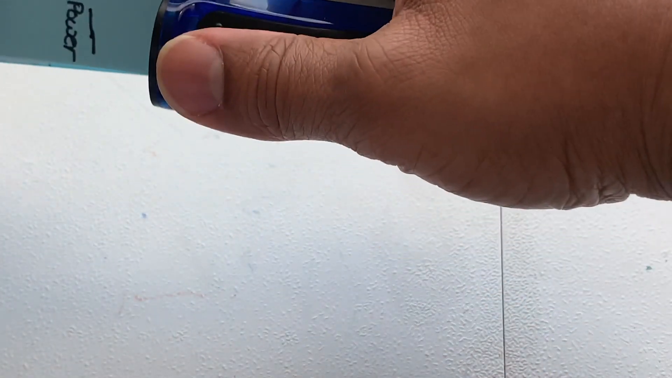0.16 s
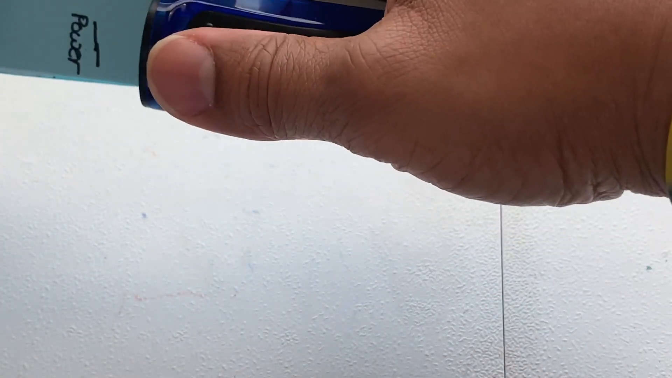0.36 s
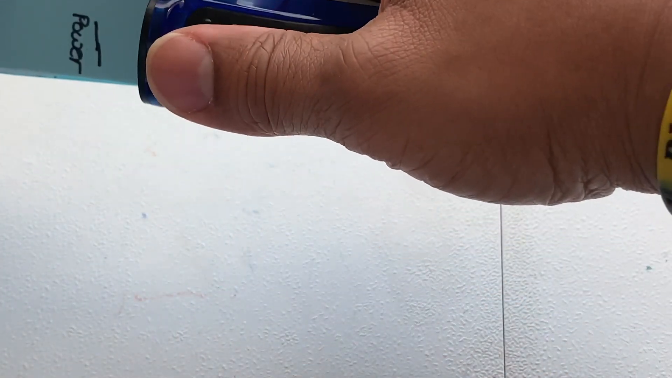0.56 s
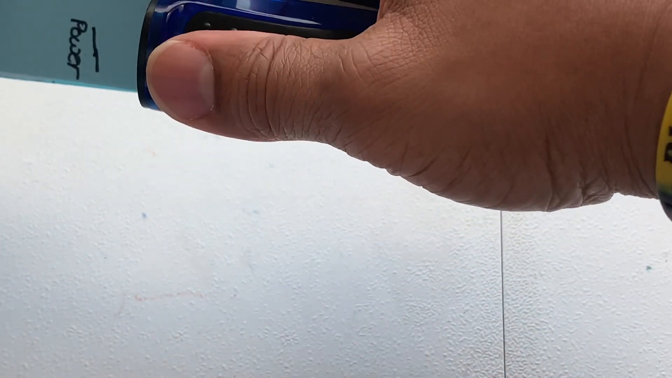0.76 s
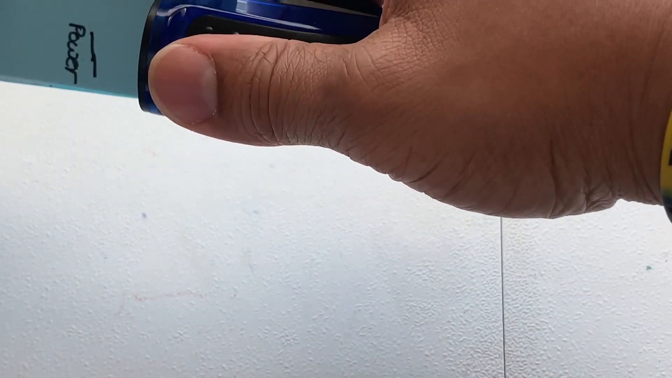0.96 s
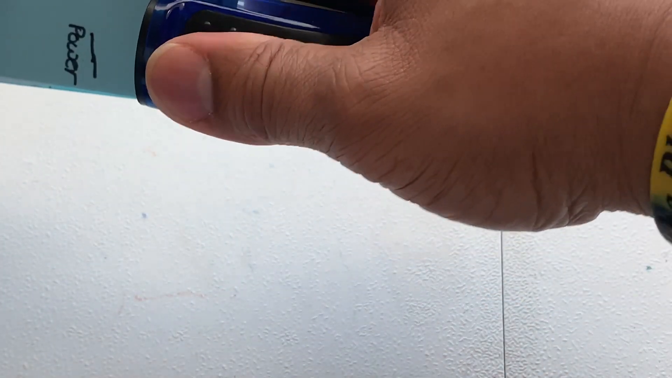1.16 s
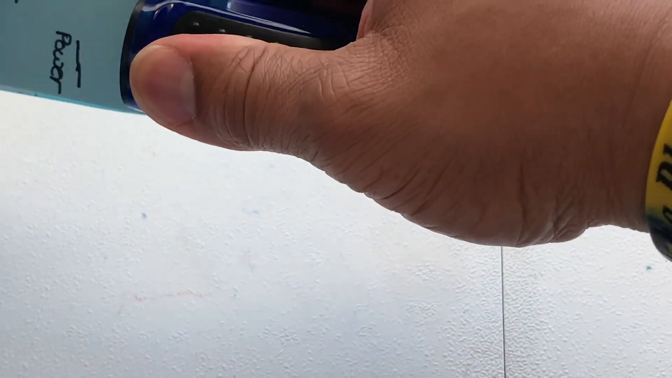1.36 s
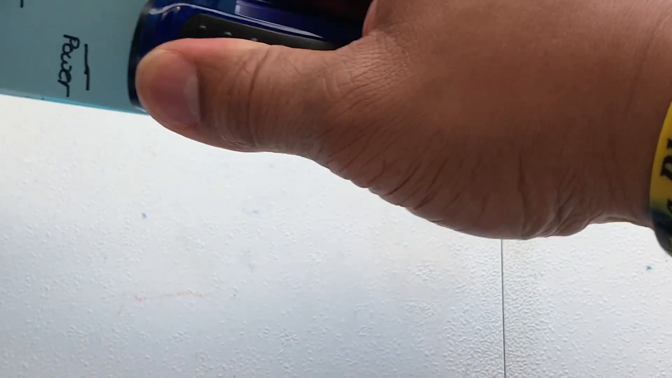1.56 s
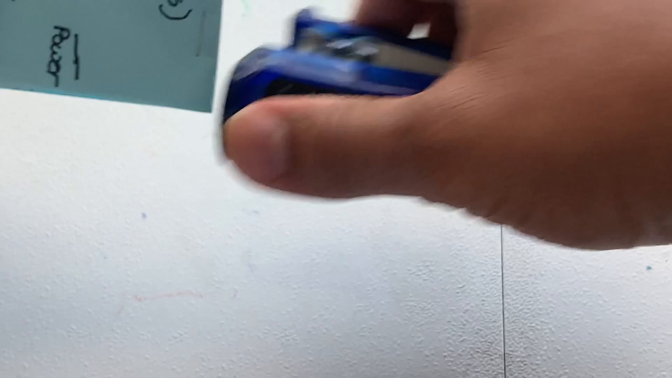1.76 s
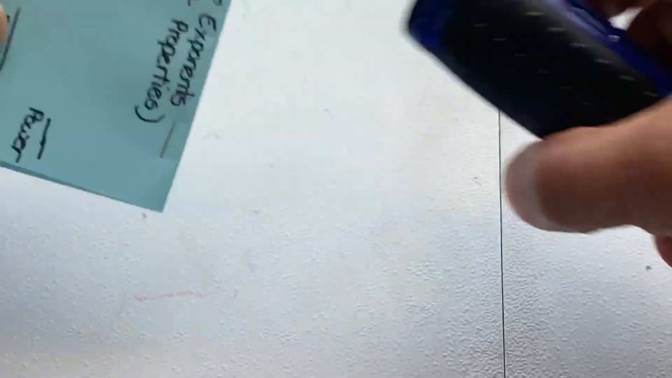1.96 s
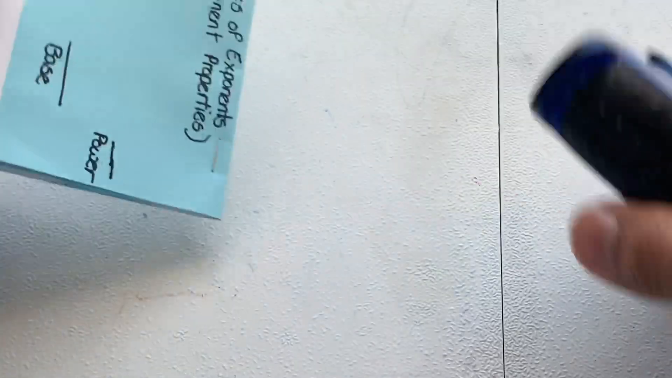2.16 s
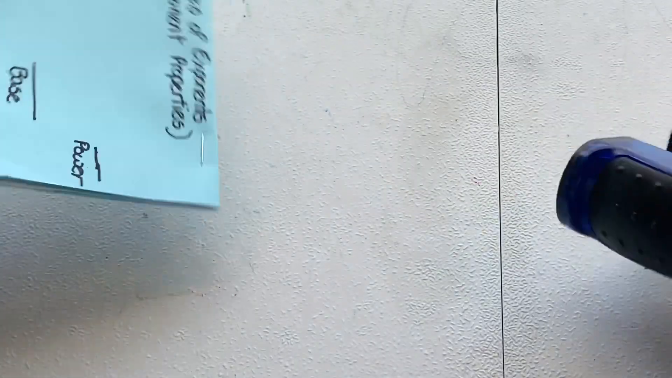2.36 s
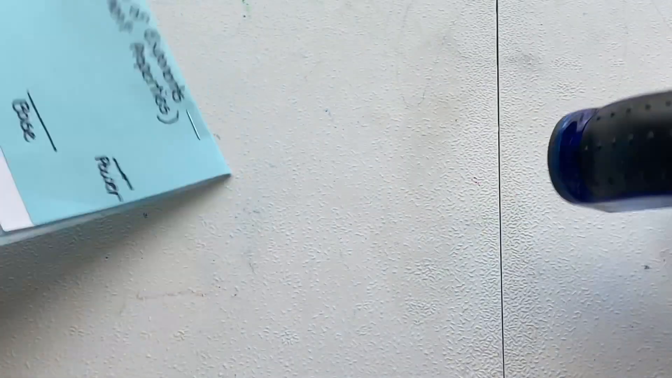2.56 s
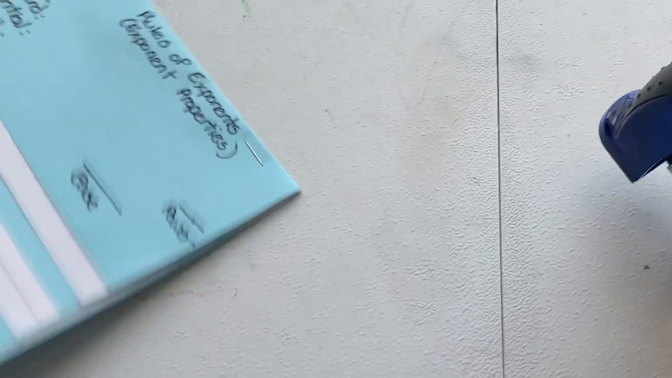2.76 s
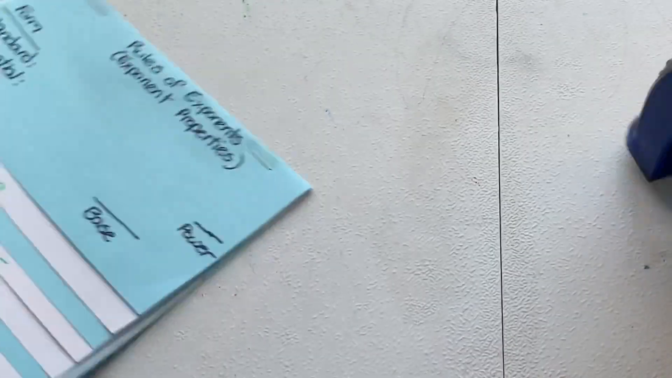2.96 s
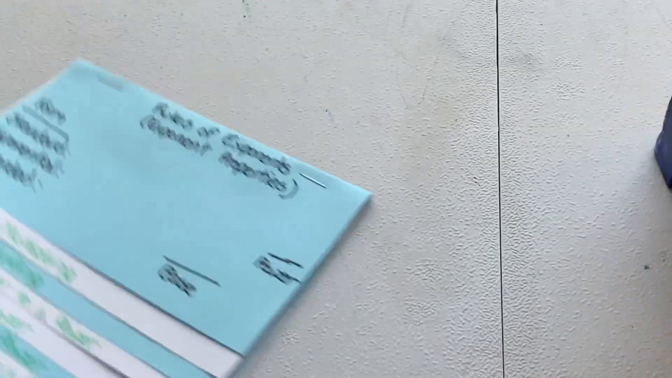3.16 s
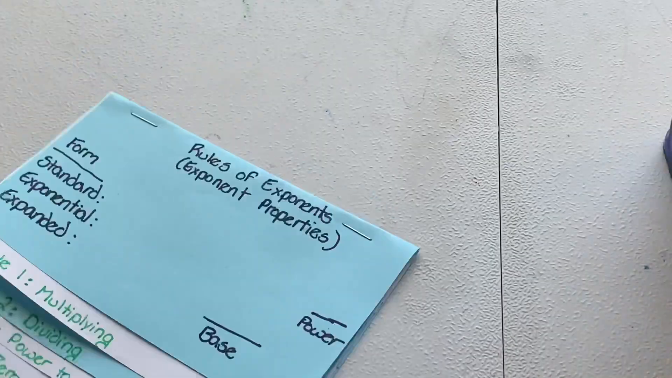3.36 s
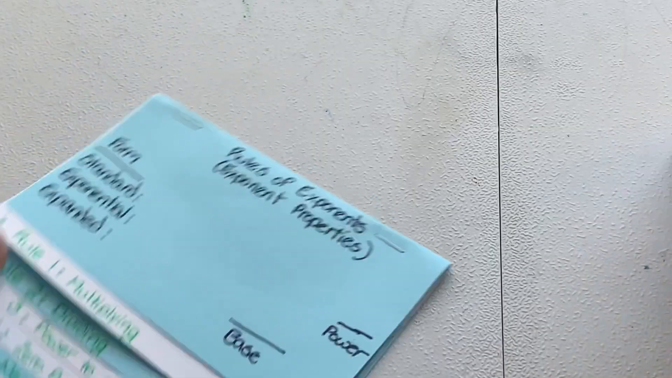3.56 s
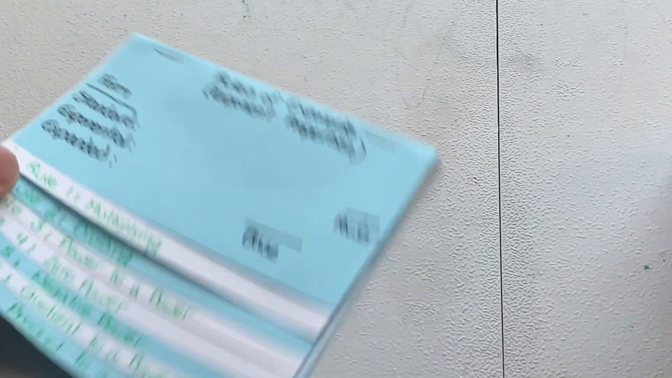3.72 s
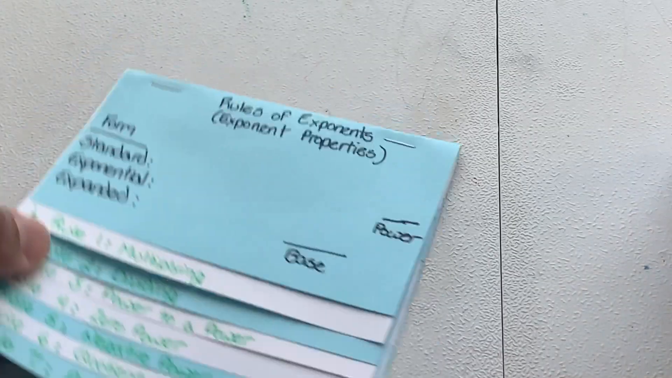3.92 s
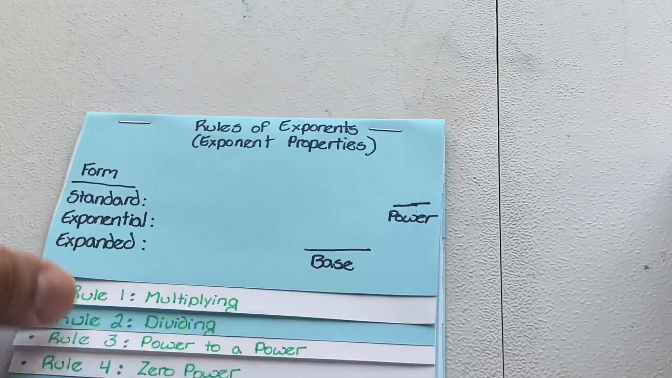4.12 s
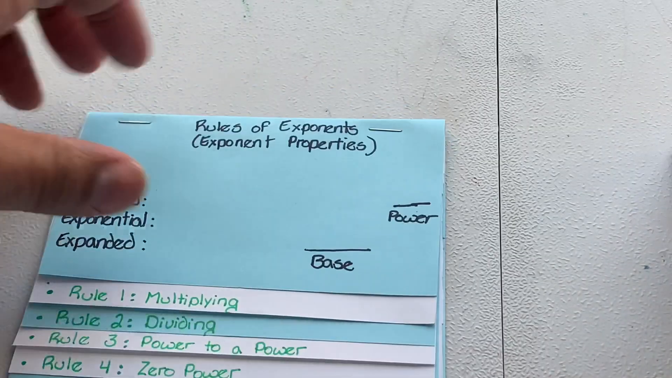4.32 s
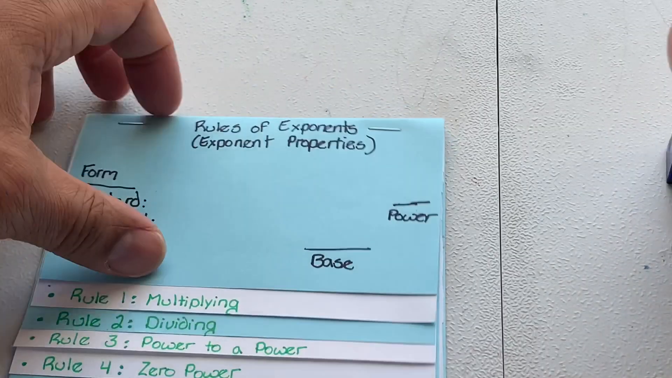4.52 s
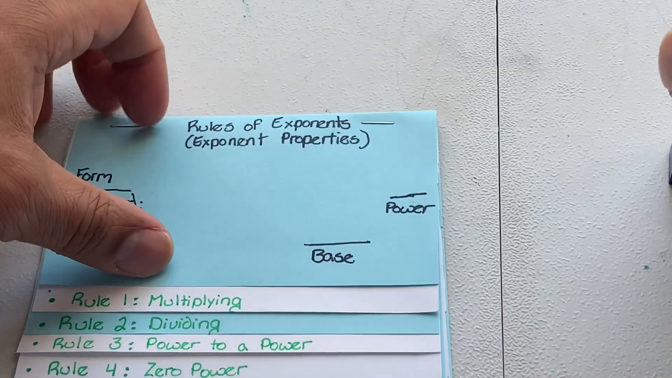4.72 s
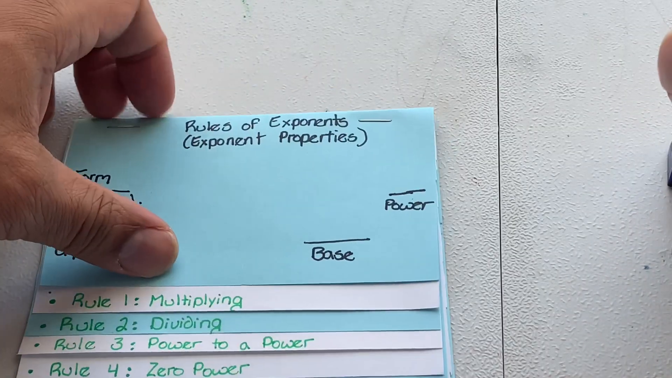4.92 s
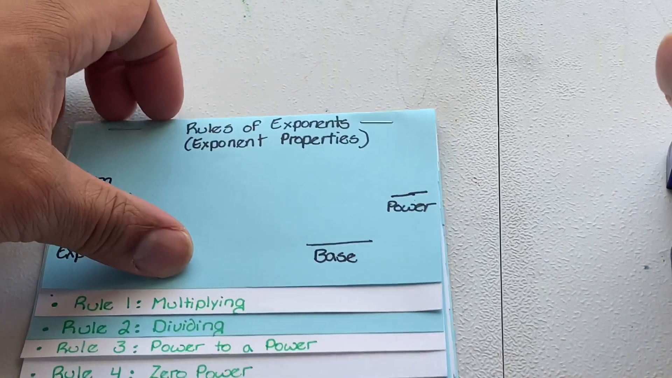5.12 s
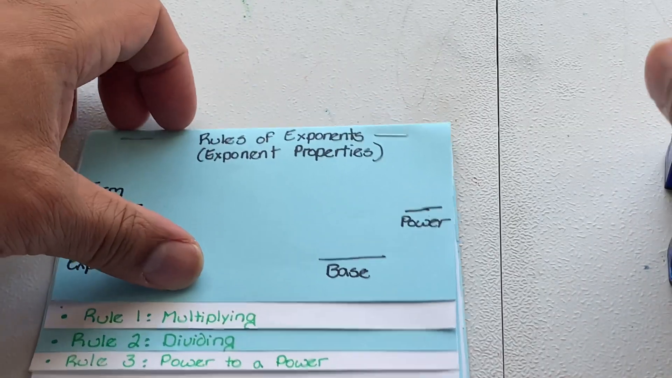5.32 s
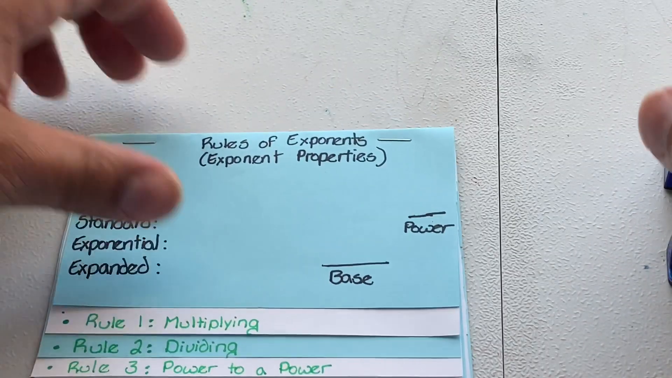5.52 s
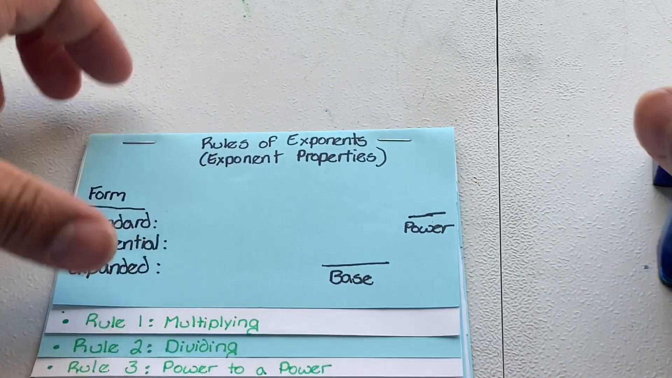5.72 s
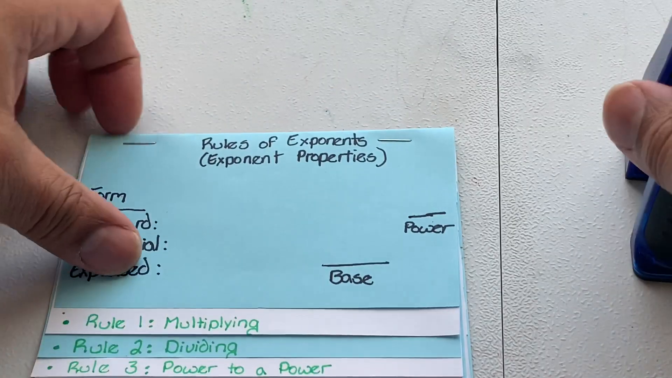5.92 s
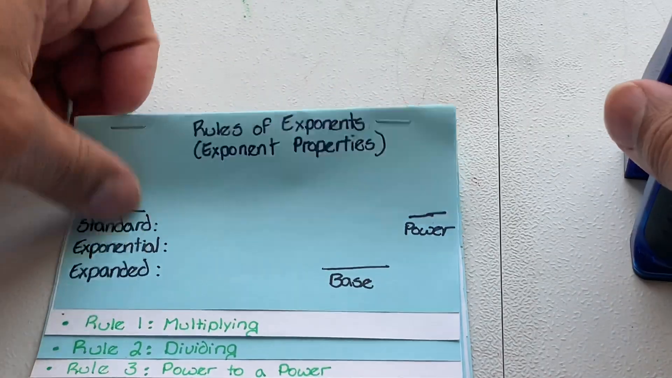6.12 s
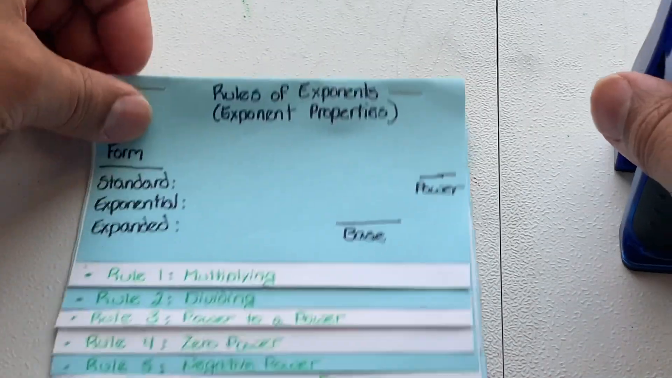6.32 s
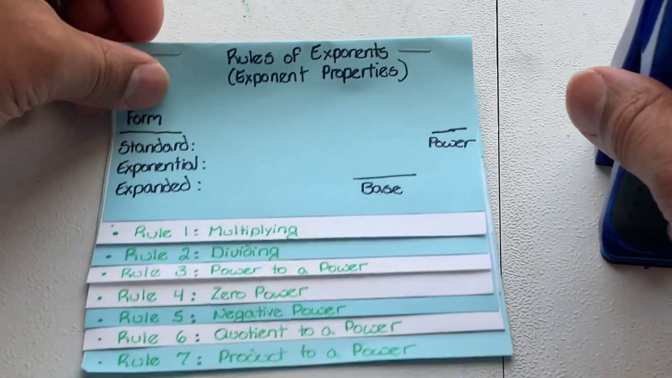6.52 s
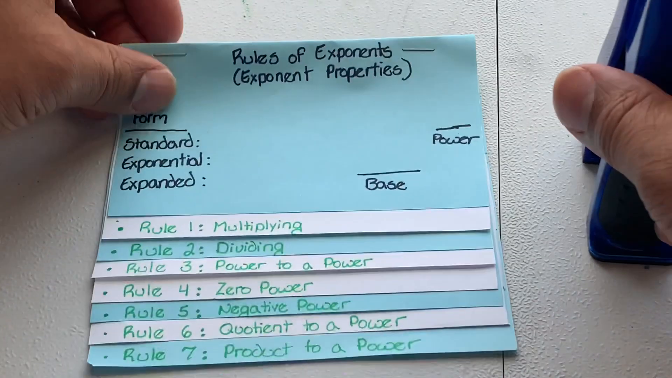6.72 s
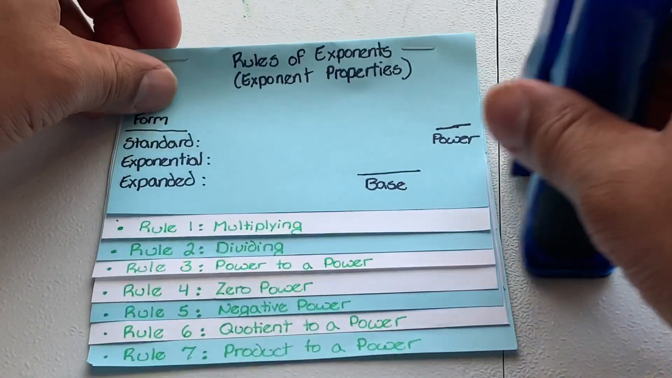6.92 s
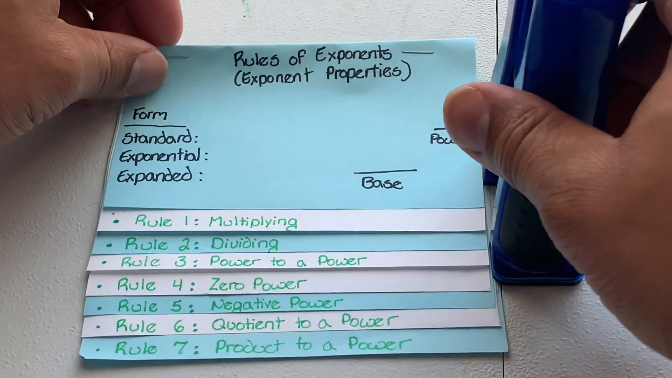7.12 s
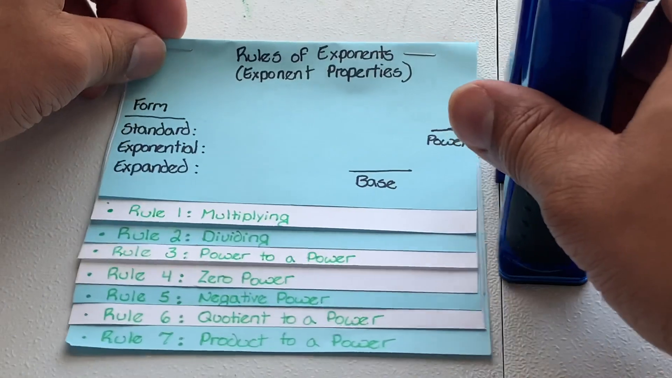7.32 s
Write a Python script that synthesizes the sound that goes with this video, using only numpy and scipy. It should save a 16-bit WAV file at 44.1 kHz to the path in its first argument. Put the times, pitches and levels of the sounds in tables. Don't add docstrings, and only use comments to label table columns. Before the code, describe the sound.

A quiet classroom with a low, steady ventilation rumble, recorded very close with a short room echo. For the first second there is almost nothing, only faint brushes of fingers on paper and a tiny touch near 1.0. At 1.13 a loud, bright stapler clack bites through folded sheets, followed at 1.22 to 1.25 by a second clack and tight chatter as the jaws shut. Around 1.57 to 1.61 the spring slips in quick small clicks and the arm snaps to a stop. From 1.85 the paper booklet is turned with airy rustling; hollow desk knocks land at 2.3 and 2.46, the strongest at 2.66 and 3.0 with a scrape. Pages rub in coarse strokes from 3.2 to 3.75, then a slide ends at 4.0. Light taps and paper ticks follow, a soft thump at 4.47, small knocks near 5.75, a crisp swish at 6.1, then faint brushing to about 7.3.

```python
import sys
import numpy as np
from scipy import signal
from scipy.fft import rfft, irfft, next_fast_len
from scipy.io import wavfile
from scipy.ndimage import uniform_filter1d

SR = 44100
rng = np.random.default_rng(int(sys.argv[2]) if len(sys.argv) > 2 else 0)


def gain_from_db(level_db):
    decades = np.asarray(level_db, float) / 20
    return 10 ** decades


def transcribe(signal):
    frames = np.atleast_2d(signal).T
    limited = np.clip(frames, -1, 1)
    pcm = np.round(limited * 32767).astype(np.int16)
    wavfile.write(sys.argv[1], SR, pcm)


N = 325458

# f/Hz, level/dB, t60/s
DESK_MODES = [(69, -10, 0.27), (133, 5, 0.2), (202.6, 6.5, 0.16), (251.8, -5.5, 0.32), (293, -1, 0.22),
              (357, -11, 0.26), (396, -14.5, .2), (446, -26, 0.05), (703, -15, 0.063), (859, -28.5, 0.16)]
DESK_FIRST_T60_S = 0.023
# low f/Hz, high f/Hz
CRACK_BANDS = [(5530, 14000), (1490, 4300), (875, 2040)]


def evened(x):
    return x / np.sqrt(np.mean(x ** 2) + 1e-20)


def read(points, hz):
    f, value = np.transpose(points)
    return np.interp(np.log(hz + 1), np.log(f + 1), value)


def add(mix, start_s, sound):
    part = mix[round(start_s * SR):][:len(sound)]
    part += sound[:len(part)]


def band(x, low_hz, high_hz):
    edges_hz = [low_hz, min(high_hz, SR / 2.1)]
    return signal.sosfilt(signal.butter(2, edges_hz, "band", fs=SR, output="sos"), x)


def ring(modes, spread_db=0., first_t60_s=None, split=0.):
    t = np.arange(SR // 3) / SR
    shares_db = spread_db * rng.standard_normal(len(modes))
    out = np.zeros(len(t))
    for (hz, db, t60_s), share_db in zip(modes, shares_db):
        decay = gain_from_db(db + share_db - 60 * t / t60_s)
        for detune in split * rng.uniform(-0.83, 1, 7 if split else 1):
            out += decay * np.sin(2 * np.pi * hz * (1 + detune) * t)
    if first_t60_s:
        out = out * (0.7 + gain_from_db(-60 * t / first_t60_s))
    return out


def hiss(spectrum, same, patchy_db, size):
    hop = size // 4
    frames, hz = N // hop + 5, np.fft.rfftfreq(size, 1 / SR)
    a, b, c, d, patches = rng.standard_normal((frames, len(hz), 5)).T
    patches = evened(uniform_filter1d(uniform_filter1d(patches, 4, 0), 45, 1))
    alike = np.clip(read(same, hz), -1, 1)[:, None]
    mid = np.sqrt(1 + alike) * (a + 1j * b)
    side = np.sqrt(1 - alike) * (c + 1j * d)
    colour = gain_from_db(read(spectrum, hz)[:, None] + patchy_db * patches)
    z = np.array([mid + side, mid - side]) * colour
    return evened(signal.istft(z, nperseg=size, noverlap=size - hop)[1][:, :N])


def ventilation():
    # f/Hz, level/dB
    air_spectrum = [(12, -62), (20, -30.5), (37, -12.5), (60, -1), (77, -18.5), (108, -10), (174, -18.5),
                    (224, -19.5), (506, -42), (750, -47.5), (2120, -54), (2370, -57.5), (5070, -63),
                    (13600, -63), (16500, -71)]
    # f/Hz, likeness/1
    air_same = [(60, .93), (300, .8), (600, 0.039), (7500, 0.046), (9500, 1), (15000, 0.42)]
    waver = rng.standard_normal((2, N))
    waver = evened(uniform_filter1d(uniform_filter1d(waver, 4000), 4000))
    fan_hz = 54.5 + 0.48 * waver[0]
    hum = np.sin(2 * np.pi * np.cumsum(fan_hz) / SR) * gain_from_db(-53 + 0.47 * waver[1])
    return hum + gain_from_db(-48.5) * hiss(air_spectrum, air_same, 0.98, size=4096)


def desk_blows():
    # t/s, crack/dB, shell/dB, thump/dB
    knocks = [(0.4676, -66, -56, -43), (1.9166, -45.5, -44.5, -50.5), (2.4599, -64, -43.5, -25),
              (2.6587, -27.5, -31.5, -9), (2.762, -43, -42, -27.5), (2.8756, -51.5, -70, -31.5),
              (3.0102, -19.5, -27.5, -12), (3.243, -35.5, -44.5, -38), (3.6103, -47, -63, -31),
              (3.8401, -60, -46.5, -32.5), (4.0667, -64, -64.5, -51), (4.256, -61, -84, -47.5),
              (4.4188, -66.5, -58.5, -42), (4.4704, -58, -36, -19.5), (4.898, -53.5, -46, -28.5),
              (5.4629, -68.5, -65, -43), (5.9991, -72, -55, -45), (6.1177, -45.5, -35, -40),
              (6.1541, -52, -46, -41), (6.5991, -58, -59, -51.5), (6.7535, -53, -51, -31),
              (7.0499, -69.5, -79, -35.5), (7.089, -49, -72, -49)]
    # t/s, crack/dB, snap/dB, thump/dB, snap f/Hz
    snaps = [(2.315, -31, -29, -15.5, 3670), (3.3426, -52.5, -60, -37.5, 2340),
             (4.3905, -51, -49, -36.5, 3600), (4.5145, -48.5, -45.5, -30, 3420),
             (4.628, -48.5, -50.5, -40.5, 4056), (4.7215, -64.5, -59, -47, 4110),
             (5.415, -75, -64.5, -53, 3308), (5.4924, -74, -64.5, -49, 1598),
             (5.7232, -55, -53.5, -33, 3440), (5.7567, -53.5, -42.5, -22, 3300),
             (5.826, -52.5, -49, -31.5, 3240), (6.1927, -54.5, -33.5, -52, 2996),
             (7.2842, -78, -70, -37, 4682)]
    blows = []
    for s, crack_db, shell_db, thump_db in knocks:
        blows.append((s, crack_db, shell_db - 29.5, shell_db, thump_db, 1715))
    for s, crack_db, snap_db, thump_db, snap_hz in snaps:
        blows.append((s, crack_db, snap_db, snap_db - 1.5, thump_db, snap_hz))
    return sorted(blows)


def stroke(t, peak_s, swell_s, fade_s):
    before = (peak_s - t) / max(swell_s, .004)
    after = (t - peak_s) / max(fade_s, .004)
    away = np.maximum(before, after)
    return gain_from_db(2 * -20 * np.minimum(away, 10) ** 1.3)


def stroke_levels(t):
    # peak t/s, swell/s, fade/s, hiss/dB, body/dB
    turns = [(1.865, .1, 0.059, -58.5, -68.5), (1.93, 0.015, 0.096, -54.5, -58),
             (2.065, 0.089, 0.12, -52, -60), (2.13, 0.081, 0.099, -62.5, -61.5),
             (2.255, 0.038, 0.1, -49, -58.5), (2.34, 0.1, .13, -48, -55), (2.47, 0.14, 0.08, -57, -63.5),
             (2.6, 0.15, 0.065, -50, -62.5), (2.711, 0.053, 0.043, -42.5, -52.5),
             (2.82, 0.29, 0.19, -49, -58.5), (2.96, 0.084, 0.17, -59.5, -75),
             (3.04, 0.086, 0.177, -57.5, -54), (3.86, 0.29, 0.3, -63, -65.5),
             (3.992, 0.084, 0.019, -51, -57.5), (4.02, .02, 0.068, -88, -90.5)]
    # peak t/s, swell/s, fade/s, hiss/dB, body/dB
    brushes = [(.276, 0.019, .11, -79, -71.5), (.46, 0.016, 0.21, -88, -81.5),
               (.995, 0.021, 0.0092, -56, -59), (1.012, .012, 0.053, -69.5, -71),
               (1.115, .02, 0.035, -82.5, -65), (4.405, .012, 0.046, -74.5, -70),
               (4.514, 0.07, 0.069, -73, -63.5), (4.632, 0.034, 0.015, -59.5, -68),
               (4.65, .012, 0.17, -82, -74), (4.92, 0.03, .03, -76.5, -66), (5.13, 0.25, 0.46, -84, -80.5),
               (5.35, 0.084, 0.048, -73, -70), (5.49, .1, 0.095, -91, -80.5), (5.825, 0.16, 0.25, -74, -65),
               (6.078, 0.0402, .1, -55, -61), (6.114, 0.068, 0.089, -43.5, -52.5),
               (6.192, .012, 0.11, -55.5, -53.5), (6.35, .2, 0.11, -59.5, -67),
               (6.48, 0.16, .1, -64, -67.5), (6.67, 0.12, 0.26, -68, -68.5), (6.85, 0.14, 0.094, -75, -71),
               (7.02, 0.11, 0.16, -75.5, -71.5), (7.276, 0.1, 0.1, -75.5, -70.5)]
    # peak t/s, swell/s, fade/s, hiss/dB, body/dB
    rubs = [
        (3.242, 0.084, 0.085, -54, -56.5),
        (3.345, 0.057, 0.11, -52, -50),
        (3.425, .1, 0.041, -53, -56),
        (3.556, .13, 0.024, -58.5, -57.5),
        (3.62, 0.042, 0.04, -43, -45),
        (3.685, 0.027, 0.054, -48, -57.5),
        (3.725, 0.054, 0.034, -44, -46),
    ]
    # peak t/s, swell/s, fade/s, drag/dB
    scrapes = [
        (2.44, 0.13, 0.035, -29.5),
        (2.991, 0.032, 0.075, -28),
        (3.09, .05, 0.24, -42.5),
        (3.9, .05, 0.14, -44.5),
        (5.85, .06, 0.12, -34.5),
    ]
    plain_db = -9
    kinds = ((turns, 0, -0.6, 0), (brushes, 0, -4, 0), (rubs, plain_db, plain_db, 1))
    power = np.zeros((5, len(t)))
    for table, fold_db, sheet_db, pocket in kinds:
        for peak_s, swell_s, fade_s, hiss_db, body_db in table:
            layers = gain_from_db([hiss_db, body_db + fold_db, body_db + sheet_db, body_db, body_db + 3.5])
            layers = layers * [1, 1, 1, pocket, 1]
            power += layers[:, None] ** 2 * stroke(t, peak_s, swell_s, fade_s)
    swell_s, fade_s = 0.014, 0.085
    for s, *_, thump_db, _hz in desk_blows():
        power[-1] += gain_from_db(thump_db - 11.5) ** 2 * stroke(t, s + swell_s, swell_s, fade_s)
    for peak_s, swell_s, fade_s, drag_db in scrapes:
        power[-1] += gain_from_db(drag_db) ** 2 * stroke(t, peak_s, swell_s, fade_s)
    return np.sqrt(power)


def slides():
    # f/Hz, level/dB
    paper_spectrum = [(400, -43.5), (750, -15.5), (1150, -6), (1500, -9.5), (2000, -7.5), (2900, -4.5),
                      (3600, -5.5), (4600, -5), (5700, -5.5), (6800, -4.5), (8980, -0.5), (14300, -8),
                      (15700, -7), (16500, -31)]
    # f/Hz, likeness/1
    paper_same = [(300, .9), (1500, 0.23), (3000, 0.39), (6500, 0.28), (10000, 0.98), (15000, 0.13)]
    paper_edges = [2400, 5100]
    # f/Hz, width/Hz, level/dB
    air_pockets = [(1950, 330, 0), (4700, 600, -9)]
    t = np.arange(0, N / SR + .002, .001)
    levels = [np.interp(np.arange(N) / SR, t, level) for level in stroke_levels(t)]
    grain = gain_from_db(0.99 * evened(uniform_filter1d(rng.exponential(1, N) - 1, 60)))
    snaps = (rng.random(N) < 45 / SR) * rng.exponential(0.29, N)
    grain = grain + signal.oaconvolve(snaps, np.exp(-np.arange(300) / 50))[:N]
    rub = rfft(grain * hiss(paper_spectrum, paper_same, 3, size=256))
    hz = np.fft.rfftfreq(N, 1 / SR)
    pockets = sum(gain_from_db(db) / (1 + ((hz - f_hz) / width_hz) ** 2) for f_hz, width_hz, db in air_pockets)
    above_sheet, above_fold = (1 / (1 + (edge_hz / (hz + 1)) ** 6) for edge_hz in paper_edges)
    shares = above_fold, above_sheet - above_fold, 1 - above_sheet, pockets
    paper = sum(level * evened(irfft(rub * share, N)) for level, share in zip(levels, shares))
    lumps = gain_from_db(3.3 * evened(uniform_filter1d(rng.standard_normal(N), 500)))
    desk = ring(DESK_MODES, 0., DESK_FIRST_T60_S)
    drag = evened(signal.fftconvolve(rng.standard_normal(N) * lumps, desk)[:N])
    return paper, levels[-1] * band(drag, 50, 520)


def strike(row, body, creep_db, bands, lag_ms, push_ms):
    s, *crack_db, thump_db, length_ms = row
    lead_s = .012
    t = np.arange(SR // 10) / SR - lead_s
    u = np.maximum(t, 0) * 1000 / max(length_ms, .2)
    rattle = gain_from_db(-11.5 - 540 * abs(t)) * (t > 0)
    creep = gain_from_db(creep_db + 3000 * np.minimum(t, 0)) * (t <= 0)
    shape = u * np.exp(1 - u) + rattle + creep
    grain = gain_from_db(3.0 * evened(uniform_filter1d(rng.standard_normal(len(t)), 12)))
    crack = np.zeros(len(t))
    for noise, edge, db in zip(rng.standard_normal((len(bands), len(t))), bands, crack_db):
        part = band(noise * grain * shape ** (1 + edge[0] / 12000), *edge)
        crack += gain_from_db(db) * part / abs(part).max()
    v = np.maximum(t * 1000 - lag_ms, 0) / push_ms
    wobble = uniform_filter1d(rng.standard_normal(len(t)), 20) * v * np.exp(-v / 8)
    push = v * np.exp(-v) + .25 * wobble
    thump = band(signal.fftconvolve(push, body)[:len(body)], 81, 2700)
    return s - lead_s, crack, gain_from_db(thump_db) * thump / abs(thump).max()


def taps():
    out = np.zeros(N)
    for s, *crack_db, thump_db, snap_hz in desk_blows():
        filled_db = np.maximum(crack_db, max(crack_db) - 20)
        softness_db = thump_db - max(crack_db)
        length_ms = 2.0 + 0.028 * max(softness_db, 0)
        push_ms = 0.27 + 0.05 * np.clip(softness_db, 0, 25)
        bands = [CRACK_BANDS[0], (snap_hz / 1.095, snap_hz * 1.12), CRACK_BANDS[2]]
        desk = ring(DESK_MODES, 2, DESK_FIRST_T60_S)
        row = (s, *filled_db, thump_db, length_ms)
        start_s, crack, thump = strike(row, desk, -30, bands, lag_ms=0.63, push_ms=push_ms)
        add(out, start_s, crack)
        add(out, start_s, thump)
    return out


def stapler():
    # t/s, crack/dB, jaw/dB, shell/dB, thump/dB
    clacks = [
        (0.9876, -32, -48.5, -60, -47.5),
        (1.1331, 4, -5, -21, -11.5),
        (1.141, -16.5, -20, -39, -27.5),
        (1.2175, -1, -14, -13, -16.5),
        (1.2488, -14.5, -22, -22, -31),
        (1.2514, -4.5, -2.5, -13.5, -12.5),
        (1.2547, -9, -9.5, -23.5, -14.5),
        (1.5657, -60.5, -45.5, -48, -58.5),
        (1.6037, -5, -5, -28, -36),
    ]
    # t/s, crack/dB, jaw/dB, shell/dB, thump/dB
    slips = [
        (1.575, -55, -43.5, -44.5, -57),
        (1.584, -29.5, -38, -39.5, -53.5),
        (1.5924, -20, -29, -49.5, -39.5),
        (1.6079, -9, -29.5, -40, -25.5),
    ]
    # f/Hz, level/dB, t60/s
    steel_modes = [(1120, -9, .13), (1290, -9, .12), (1660, -6, .16), (2220, -6, .14), (2640, -4, .22),
                   (3750, -13, .14), (4255, -9, .2), (4850, -12, .14), (6320, -17, .13), (7110, -15, .11),
                   (8600, -13, .13), (10130, -13, .2), (11000, -15, .22), (12900, -18, .12)]
    # f/Hz, level/dB, t60/s
    housing_modes = [(135, -12.5, 0.018), (236, -5.5, 0.031), (284, -2.5, 0.029), (366, -3.5, 0.013),
                     (562, -27, 0.083)]
    # f/Hz, level/dB, t60/s
    jaw_modes = [(1690, -13, 0.016), (2620, -6, 0.01), (8600, -12, .01)]
    # f/Hz, level/dB, t60/s
    cap_mode = (1120, -1, .016)
    cracks, thumps = np.zeros((2, N))
    t = np.arange(2000) / SR
    arm = sum(gain_from_db(db - 60 * t / t60_s) * np.sin(2 * np.pi * hz * t) for hz, db, t60_s in jaw_modes)
    cap_hz, cap_db, cap_t60_s = cap_mode
    cap = gain_from_db(cap_db - 60 * t / cap_t60_s) * np.sin(2 * np.pi * cap_hz * t)
    clack_ms, slip_ms = 1.25, 2.2
    for row in sorted([(*r, clack_ms) for r in clacks] + [(*r, slip_ms) for r in slips]):
        hit_s, _, jaw_db, shell_db, *_ = row
        housing = ring(housing_modes, 3.3)
        start_s, crack, thump = strike(row, housing, -17.0, CRACK_BANDS, lag_ms=1.9, push_ms=0.12)
        add(cracks, start_s, crack)
        add(thumps, start_s, thump)
        add(thumps, hit_s + 0.001, gain_from_db(jaw_db) * arm + gain_from_db(shell_db) * cap)
    gripped = ring([(hz, db, .018) for hz, db, _ in steel_modes])
    steel = gain_from_db(-30.5) * gripped + gain_from_db(-66) * ring(steel_modes, split=0.037)
    return 0.69 * cracks + thumps + signal.oaconvolve(cracks, steel)[:N]


def ports(x):
    # f/Hz, level/dB
    port_side = [(60, -16), (110, -22.5), (200, -18), (380, -9), (700, -4.5), (1290, -8), (2380, -1.5),
                 (4400, 2), (8120, -6), (15000, -7)]
    size = next_fast_len(N)
    tilt = gain_from_db(read(port_side, np.fft.rfftfreq(size, 1 / SR)))
    side = irfft(rfft(x, size) * tilt * np.exp(-1.45j), size)[:N]
    return np.array([x + side, x - side])


def room(x):
    # f/Hz, t60/s
    room_t60 = [(100, 0.26), (500, 0.18), (2500, 0.4), (6000, 0.33), (12000, 0.34), (16000, 0.2)]
    echo = np.zeros((2, SR))
    at = np.arange(130, SR - 20, 20) + rng.integers(0, 20, (2, (SR - 131) // 20))
    np.put_along_axis(echo, at, rng.choice([-1., 1.], at.shape), 1)
    echo[1] = 0.42 * echo[0] + 0.73 * echo[1]
    hz, t, z = signal.stft(echo, SR, nperseg=256)
    decay = gain_from_db(-60 * t / read(room_t60, hz)[:, None])
    tail = signal.istft(z * decay, SR, nperseg=256)[1]
    return signal.fftconvolve(x[None], tail / np.linalg.norm(tail[0]), axes=1)[:, :N]


def scene():
    paper, drag = slides()
    hits = stapler() + taps() + drag
    mix = ports(hits) + gain_from_db(-16.5) * room(hits) + paper + ventilation()
    return mix * gain_from_db([[.4], [-.4]])


def band_limit(x):
    return signal.sosfilt(signal.butter(12, 16970, fs=SR, output="sos"), x)


def record(dry):
    heard = signal.sosfilt(signal.butter(3, 45, "high", fs=SR, output="sos"), dry)
    heard = signal.sosfilt(signal.butter(8, 16200, fs=SR, output="sos"), heard)
    return band_limit(1.404 * np.tanh(heard / 1.603))


dry = scene()
out = record(dry)
transcribe(out)
```